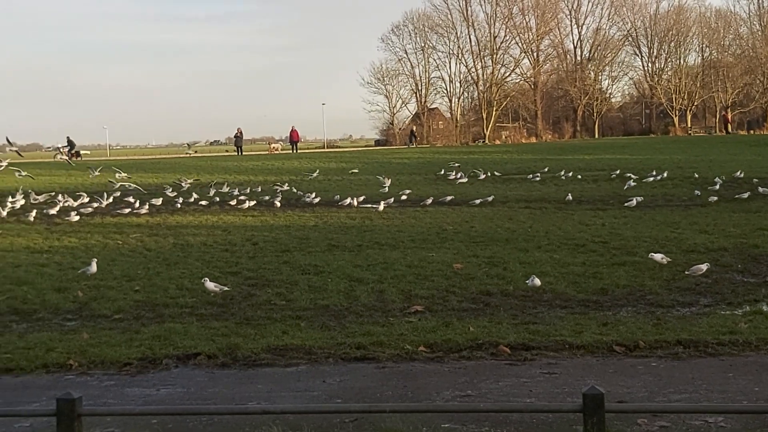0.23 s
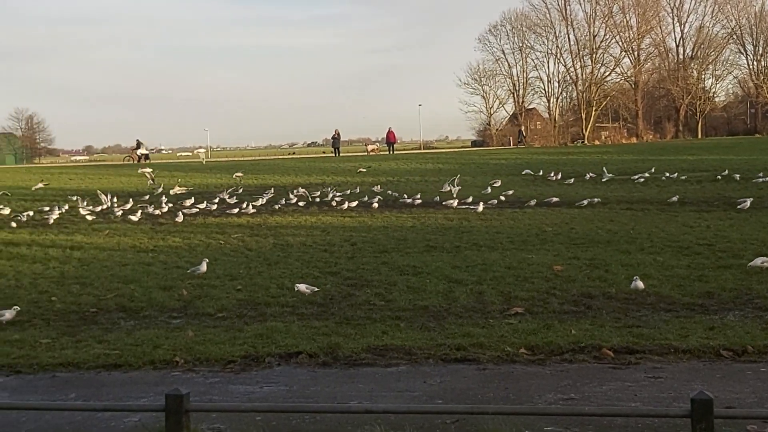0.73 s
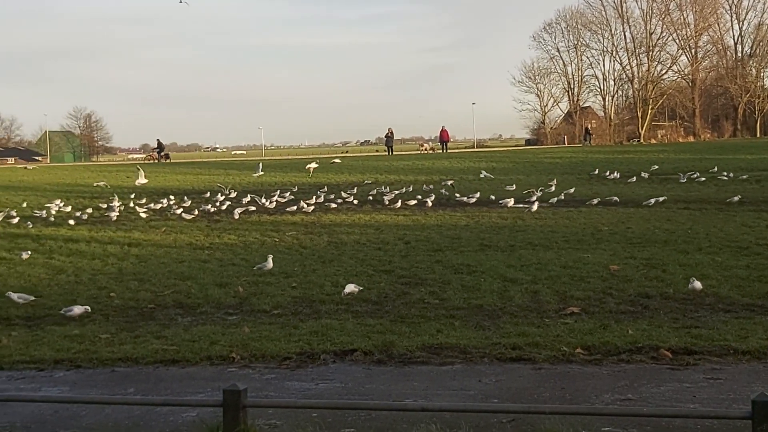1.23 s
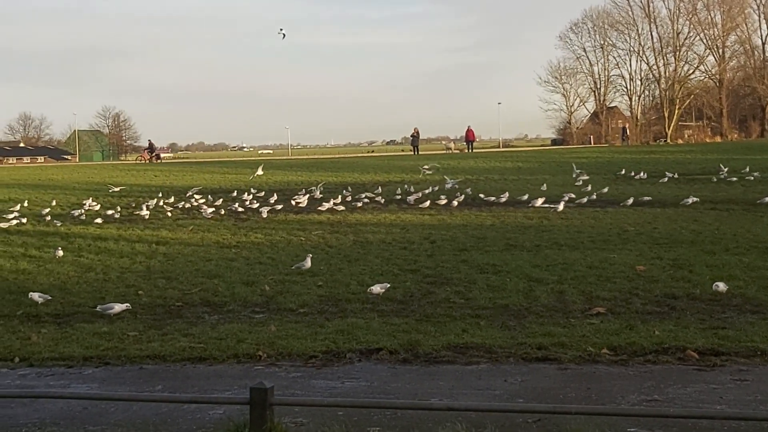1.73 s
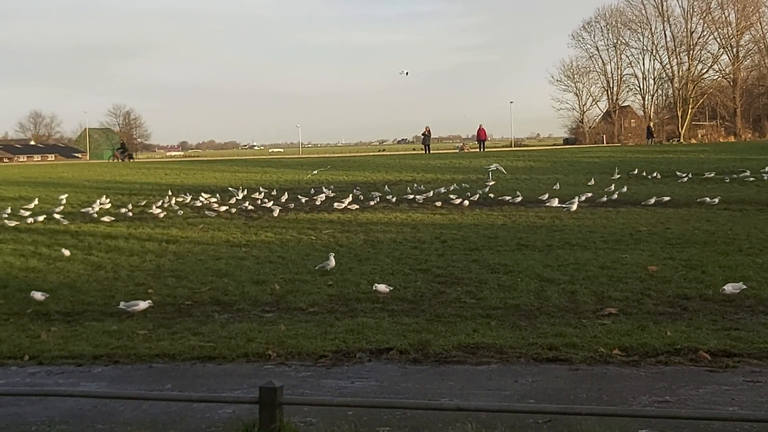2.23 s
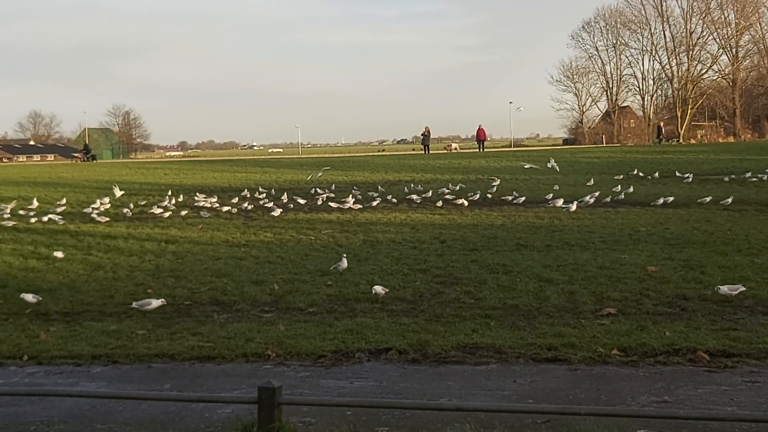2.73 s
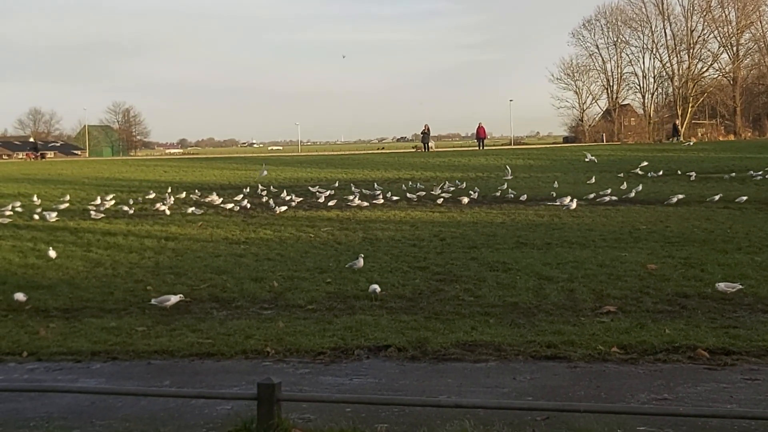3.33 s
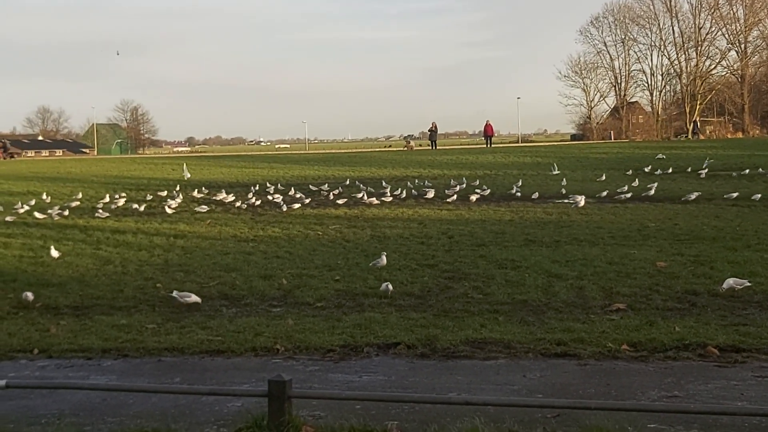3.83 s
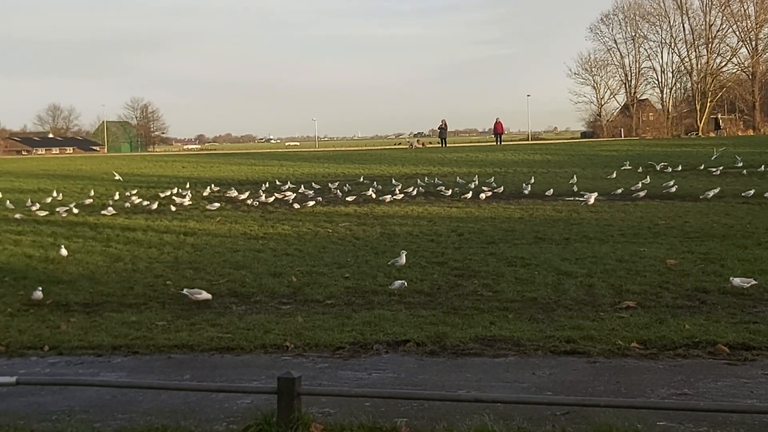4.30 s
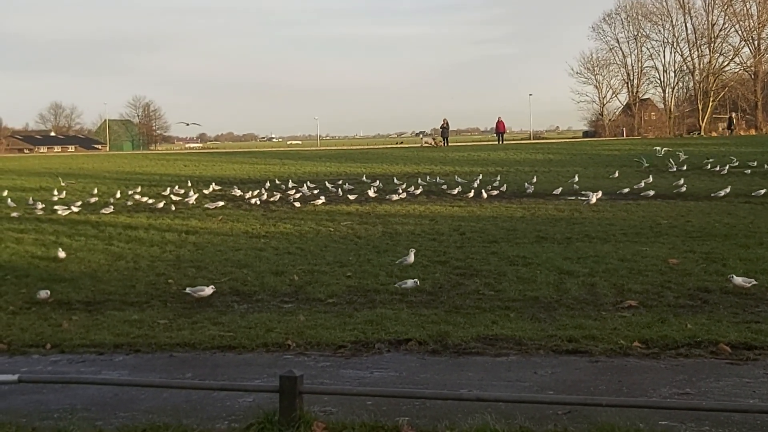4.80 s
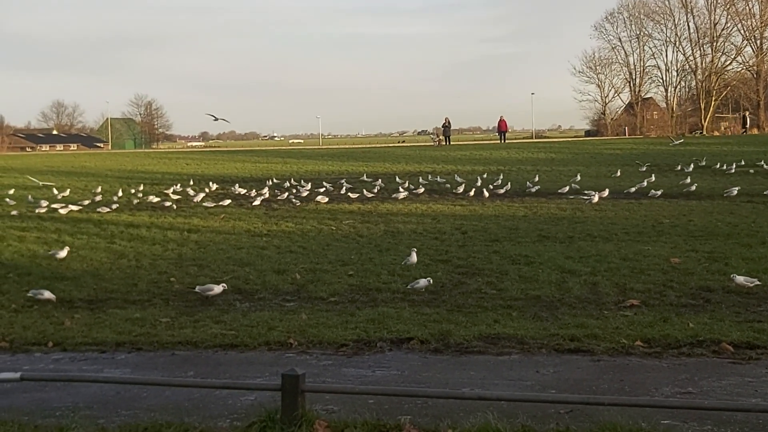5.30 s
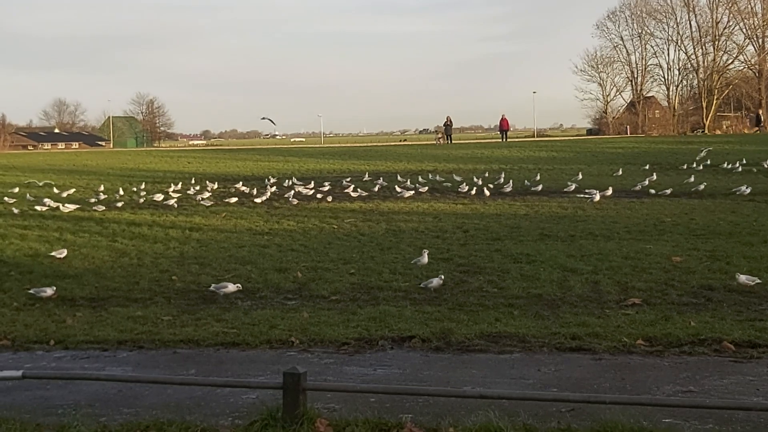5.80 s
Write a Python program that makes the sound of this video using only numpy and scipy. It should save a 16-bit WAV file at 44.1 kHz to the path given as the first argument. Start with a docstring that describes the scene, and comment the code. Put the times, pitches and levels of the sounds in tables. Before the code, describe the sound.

A flock of gulls cries with clear falling calls and raspy screams over an open field, while wind rumbles and finally batters the microphone.

```python
"""Open grass field: a flock of gulls, mostly right of centre, heard by a spaced pair of small microphones.
Near birds: falling clear cries and rattled screams, built from overtones, plus a short tail of echoes.
Behind them: faint overlapping far calls over third-octave hiss bands of changing level.
Wind: rumble, flutter and single buffets of filtered noise on the microphones, hardest near the end."""
import sys
import numpy as np
from scipy import signal
from scipy.fft import rfft, irfft, next_fast_len
from scipy.io import wavfile
from scipy.ndimage import uniform_filter1d

SR = 44100
rng = np.random.default_rng(int(sys.argv[2]) if len(sys.argv) > 2 else 0)


def put_to_file(sound):
    """Save the sound as 16-bit audio at rate SR, in the file named by the first command-line argument."""
    columns = np.atleast_2d(sound).T  # one column per channel
    safe = np.clip(columns, -1, 1)
    whole_steps = np.round(safe * 32767)
    wavfile.write(sys.argv[1], SR, whole_steps.astype(np.int16))


N = 266937

# near-bird voices, by name: start offset below pitch/share (negative: above), start softness/dB,
# start time constant/s, sag curve power, share of sag in one sudden break,
# [warble only: pitch dip at the break/share], overtone levels from the first up/dB
BIRD_VOICES = {"whistle": (0.0046, 7.2, 0.014, 1.2, 0.075, [3, -27, -29, -31, -25.5, -43.5, -49]),
               "pipe": (0.018, 6, 0.008, 2.5, 0.33, [2, -15.5, -44, -50, -56, -60, -62]),
               "shrill": (0.0117, 4.4, 0.023, 1.1, 0.07, [-2, -11, -12, -4.5, -20, -44, -43]),
               "open": (0.029, 3.5, 0.0179, 1.8, 0.079, [-9, -1, -2.5, -7, -22, -13.5, -26]),
               "reedy": (0.052, 4.9, 0.021, 2.8, 0.052, [-6, -8, -6.5, -10, -4, -25, -14, -20, -25, -38, -44]),
               "warble": (0.0427, 2.7, 0.01, 5, 0.2, .06, [-12, -18, -2.5, -8, -4, -9, -19, -16, -21]),
               "squeal": (0.0254, 3.5, 0.017, 1, 0.093, [-32, -1, -11, -17, -44, -38, -33]),
               "chirp": (-0.134, 5.6, 0.0258, 4, 0.045, [-20, 1, -12, -27, -35, -37, -45]),
               "yip": (0.029, 5, .008, 3.5, 0.046, [0, -3, 1, -7, -9, -12, -26, -17, -20, -25]),
               "peep": (0.045, 5, 0.0087, 2.4, 0.05, [-8, -2, -8, -14, 1, -9, -28, -34]),
               "twin": (0.0082, 4, 0.012, 1.35, 0.06, [-28, -1, -26, -1.5, -30, -36, -46]),
               "thin": (0.0416, 5.8, 0.0242, 1.61, 0.029, [-28, -39, -40, -12, 7.5, -1, -7]),
               "scream": (0.14, 7.1, .022, 4.5, 0.076, [-10, 0, -21.5, -25, -25.5, -22.5, -24]),
               "shriek": (0.23, 9, .022, 1.9, 0.098, [-8, -0.5, -14, -33, -18.5, -22.5, -24]),
               "rasp": (0.0538, 13, 0.0139, 0.5, 0.069, [-2, -36, -51, -40, -34, -14, -20])}
# near-bird cries: t/s, length/s, f/Hz, sag by the end/Hz, level/dB, fade by the end/dB,
# brightness/dB per overtone from the strongest, left lag/ms (negative: left leads),
# rattle/Hz (clear cry unless above 30), voice name
GULL_CRIES = [(0.0, 0.33, 1602, 58, -41.5, 6.5, 3.5, 0.32, 6, "whistle"),
              (0.123, 0.13, 4740, 524, -50, -10, -10, .34, 0, "whistle"),
              (0.291, 0.023, 947, 13, -40, 4, 3, 0.48, 0, "squeal"),
              (0.308, 0.02, 1180, 140, -46, -4, -8, .39, 0, "squeal"),
              (0.296, 0.098, 1120, 34, -51, 0, 0.5, .34, 93, "rasp"),
              (0.321, 0.089, 1172, 407, -41, -6, -16, 0.4, 0, "squeal"),
              (0.47, 0.031, 995, 49, -33, -1, -6, 0.46, 183, "squeal"),
              (0.498, 0.029, 925, 31, -33.5, -3, -7, 0.46, 181, "squeal"),
              (0.486, 0.093, 1325, 153, -58.5, 8, 0, .35, -2, "thin"),
              (0.584, 0.068, 1020, 280, -41, -4, -6, 0.44, 3, "chirp"),
              (0.446, 0.13, 1237, 180.5, -41.5, 8.5, 0.5, .41, 91.5, "rasp"),
              (0.6, 0.19, 1044, 68, -52, -2, -1, .34, 86, "rasp"),
              (0.921, 0.041, 1062, -120, -42.5, 12, -14, 0.51, 0, "open"),
              (0.962, 0.285, 1704, 228, -29.5, 12, 2.5, -.17, 0, "pipe"),
              (1.053, 0.14, 865, 28.5, -53, 5, 1.5, -.19, 85.5, "thin"),
              (1.24, 0.046, 1031, 64, -43.5, 5, -1.5, 0.43, 0, "open"),
              (1.449, 0.35, 1012, 73.5, -38, 14, 1.5, 0.31, 77.5, "rasp"),
              (1.74, 0.44, 996, 37.5, -34.5, 8, -1, 0.38, 72, "rasp"),
              (1.796, 0.21, 1737, 188.5, -29, 3.5, 4.5, 0.44, -5, "pipe"),
              (1.859, 0.36, 1087, 41, -42, 14, 1, 0.46, 84, "shriek"),
              (1.822, 0.27, 1633, -40, -42.5, 11, 1, 0.35, 0, "squeal"),
              (2.014, 0.084, 2155, 100, -41.5, 1, -1, 0.46, 0, "whistle"),
              (2.116, 0.18, 1300, 165.5, -37.5, 6, -1, .32, 0, "warble"),
              (2.098, 0.22, 1110, 29.5, -50, -5, -12, 0.43, 88.5, "shriek"),
              (2.364, 0.13, 1598, 120, -51, 8, -11, 0.23, 4, "squeal"),
              (2.349, 0.33, 1049, 32, -84.5, 5, 8.5, .29, 0, "open"),
              (2.637, 0.11, 2034, 264, -41, -7, -1, 0.42, 0, "shrill"),
              (2.663, 0.25, 1390, 251, -37, 8.5, 0, 0.26, 0, "reedy"),
              (2.881, 0.39, 1104, 47, -59, -9, 4, 0.35, 72, "scream"),
              (3.193, 0.39, 1308, 36, -47, 15, 0.5, .33, 68, "squeal"),
              (3.442, 0.46, 1038, 250, -33.5, 10, -0.5, 0.53, 88, "scream"),
              (3.7, 0.6, 959, 73, -52.5, 0, 3.5, .01, 76, "scream"),
              (3.994, 0.26, 1354, 51.5, -52, 3.5, 3, .01, 0, "squeal"),
              (4.364, 0.33, 1069, 191, -36.5, -1, 0.5, .5, 82, "shriek"),
              (4.7, 0.022, 1243, 50, -44, 6, -2, .34, 0, "peep"),
              (4.799, 0.079, 4300, 1250, -56.5, 1, -12, 0.3, -7, "whistle"),
              (4.823, 0.08, 1253, -140, -66.5, -29, -7, 0.25, -34, "squeal"),
              (4.894, 0.14, 1600, 25.5, -48, 4, 1, .35, 0, "twin"),
              (5.036, 0.043, 4820, 899, -57, 6, -12, .23, 0, "whistle"),
              (5.082, 0.19, 1243, 68.5, -47, 5, -3, 0.47, 0, "squeal"),
              (4.87, 0.22, 1087, 22, -59.5, -4, 0.5, 0.35, 96, "rasp"),
              (5.318, 0.23, 1121, 26, -51.5, 27, 2.5, -0.068, 80, "scream"),
              (5.931, 0.17, 1441, 40, -58.5, -1, -1.5, 0.28, 0, "yip")]


def gulls():
    """Near birds: each cry reaches the ears at slightly different times; grass and trees scatter echoes."""
    direct = np.zeros((2, N))
    for start_s, *shape, bright_db, left_lag_ms, rattle_hz, voice in GULL_CRIES:
        *habit, overtones_db = BIRD_VOICES[voice]
        steps = np.arange(len(overtones_db)) - np.argmax(overtones_db)
        track = cry_track(start_s, *shape, *habit)
        place(direct, cry(track, rattle_hz, overtones_db + bright_db * steps), start_s, left_lag_ms)
    t = np.arange(int(.3 * SR)) / SR
    shared = rng.standard_normal(len(t))
    tail = shared + 3.8 * rng.standard_normal((2, len(t)))
    tail = tail * np.exp(-t / 0.16) * (t > .003)
    tail /= np.sqrt(np.sum(tail ** 2, axis=1, keepdims=True))
    echoes = signal.fftconvolve(direct, tail, axes=1)[:, :N]
    return direct + undb(-12) * echoes


RELEASE_DB, RELEASE_POWER = 10.5, 12.4  # extra fade at the very end of a cry
BREAK_AT, BREAK_WIDTH, DIP_WIDTH = .42, 0.052, 0.15  # shares of cry length


def cry_track(start_s, length_s, hz, sag_hz, db, fade_db,
              scoop, soft_db, onset_s, power, sudden, dip=0.):
    """t/s, f/Hz, level/dB: a cry swings to pitch and level, then sags and fades as the breath runs out."""
    u = np.linspace(0, 1, num=32)
    onset = np.exp(-u * length_s / onset_s)
    voice_break = (1 + np.tanh((u - BREAK_AT) / BREAK_WIDTH)) / 2
    spent = (1 - sudden) * u ** power + sudden * voice_break
    pitch_dip = dip * np.exp(-((u - BREAK_AT) / DIP_WIDTH) ** 2)
    track_hz = hz * (1 - scoop * onset - pitch_dip) - sag_hz * spent
    track_db = db - soft_db * onset - fade_db * spent - RELEASE_DB * u ** RELEASE_POWER
    return np.transpose([start_s + u * length_s, track_hz, track_db])


THROAT_HZ, THROAT_RING_DB = 5930, 2.5  # ring level relative to the sixth overtone


def cry(track, rattle_hz, overtones_db):
    """Overtones of the syrinx; a slow second oscillation chops a scream into bursts and sweeps its pitch."""
    s, hz, db = np.transpose(track)
    t = np.arange(s[0], s[-1], 1 / SR)
    n = len(t)
    rough = rattle_hz > 30
    # quick slides turn hoarse
    husk = np.clip(abs(hz[-1] / hz[0] - 1) / (s[-1] - s[0]) / 4, 0, 1)
    jitter = .011 if rough else 0.0058 + 0.015 * husk
    hz = np.interp(t, s, hz) * (1 + jitter * walk(n, 400))
    # rattle slows as the breath runs out
    beat_hz = rattle_hz * np.linspace(1.07, .92, n) * (1 + 0.034 * walk(n, 58.3))
    beat = np.cumsum(beat_hz) / SR + rng.random()  # cycles
    sweep = 2 * np.pi * np.cumsum(hz * rough * 0.052 * np.sin(2 * np.pi * beat)) / SR
    phase = 2 * np.pi * np.cumsum(hz) / SR
    # three more overtones, falling evenly
    db_all = np.append(overtones_db, np.mean(overtones_db[-2:]) - 5.16 * np.arange(1, 4))
    level_db = np.interp(t, s, db)
    effort = undb(0.44 * (level_db - db.max()))  # weaker push dulls a clear cry
    x = np.zeros(n)
    for k, gain in enumerate(undb(db_all), 1):
        gate_beat = beat + 0.024 * k * walk(n, 51.0)
        gate = np.exp((0.75 + 0.06 * k) * rough * np.cos(2 * np.pi * gate_beat))
        angle = k * phase + k ** 0.74 * sweep + 2 * np.pi * rng.random()
        if k == 1 and rough:  # lowest band peaks after each burst, sharp of the series
            gate = np.exp(2.2 * np.cos(2 * np.pi * (beat - .35)))
            angle = 1.1 * angle
        flicker = undb((2.0 + 0.07 * k + 2.5 * husk) * walk(n, 128))
        # throat resonance lifts scream overtones that cross it
        gain = gain * undb(rough * 2.5 * np.exp(-.5 * ((k * hz - THROAT_HZ) / 330) ** 2))
        push = 1 if k == 1 or rough else effort
        audible = k * hz < .45 * SR
        x += gain * push * unit(gate * flicker) * audible * np.sin(angle)
    if rough:  # bursts ring the throat, which moves less than the pitch
        ring_hz = THROAT_HZ * (hz / hz.mean()) ** 0.64 * (1 + 0.032 * walk(n, 300))
        bursts = unit(np.exp(1.3 * np.cos(2 * np.pi * beat)) * undb(1.3 * walk(n, 44.0)))
        ring = np.sin(2 * np.pi * np.cumsum(ring_hz) / SR)
        x += undb(db_all[5] + THROAT_RING_DB) * bursts * ring
    edge = np.clip(np.minimum(t - s[0], s[-1] - t) / 0.003, 0, 1)
    return np.sqrt(2) * x * edge * undb(level_db)


def place(out, x, start_s, left_lag_ms):
    """Path difference to the two microphones: the left hears the bird left_lag_ms after the right."""
    start = int(start_s * SR)
    add(out[1], x, start)
    add(out[0], x, start + int(round(left_lag_ms * SR / 1000)))


# level of the background hiss, uneven over time, used relative to fixed references:
# t/s, hiss level/dB, level of the top hiss bands/dB
HISS_LEVEL = [(0.0, -48.5, -62), (0.24, -61.5, -86), (0.51, -59, -80), (0.89, -60.5, -83), (1.12, -50, -56),
              (1.28, -61, -73), (1.38, -64, -102), (1.47, -51.5, -64), (1.52, -62, -78), (2.05, -46, -66),
              (2.2, -43.5, -66), (2.55, -67.5, -87), (2.75, -46, -59), (3.36, -57.5, -63.5),
              (3.42, -66, -78.5), (3.47, -46, -85), (3.7, -43.5, -60.5), (4.28, -62.5, -79),
              (4.6, -51, -67), (4.97, -49.5, -85), (5.26, -60, -95.5), (5.36, -63, -68), (5.55, -66, -65),
              (5.61, -78, -95), (5.88, -72.5, -102), (6.05, -65, -75)]
# extra slow change of the low hiss bands, full below 800 Hz, none above 1100 Hz: t/s, level/dB
LOW_HISS_LEVEL = [(0, 0), (2.25, 0), (2.55, -4.5), (4.4, -3), (5.2, 0), (5.7, -13)]
# background hiss spectrum: f/Hz, relative density/dB per Hz
HISS_SPECTRUM = [(290, -33), (500, 1), (660, 6), (850, 2), (1220, 2), (1430, 3), (2070, -1), (2460, -7),
                 (2970, -12.5), (4190, -7.5), (4910, -15), (6180, -10.5), (8000, -23.5), (15500, -32)]


def far_calls_and_hiss(count=70):
    """Faint overlapping calls of distant birds, plus third-octave hiss bands of changing level."""
    hiss_db, top_hiss_db = curve(HISS_LEVEL)
    low_db, = curve(LOW_HISS_LEVEL)
    voices = np.zeros((2, N))
    for u in rng.random((count, 6)):
        s, hz, length_s = 6.3 * u[0] - .3, 900 + 300 * u[1], .08 + .3 * u[2]
        scream = u[3] <= .7
        if scream:
            track = [(s, .95 * hz, -8), (s + 0.264 * length_s, hz, 0), (s + length_s, .93 * hz, -6)]
        else:  # fainter clear yelp, falling in pitch after its peak
            track = [(s, 1.1 * hz, -9), (s + .15 * length_s, 1.12 * hz, -3),
                     (s + .6 * length_s, 1.04 * hz, -9)]
        x = cry(track, (70 + 70 * u[3]) * scream, [4.0, 2.0, -8.5, -8.5, -10.5, -13.5, -11.0])
        place(voices, x * undb(-8 * u[4] ** 2), s, 0.33 + 0.22 * u[5])
    hiss, drift = np.zeros((2, N)), walk(N, 4.1)
    spectrum_hz, spectrum_db = np.transpose(HISS_SPECTRUM)
    for hz in 500 * 2 ** np.arange(0, 5.1, 1 / 3):
        mid, left, right = (band(N, hz, 0.16) for _ in range(3))
        band_db = np.interp(np.log(hz), np.log(spectrum_hz), spectrum_db) + 10 * np.log10(hz / 1000)
        # lowest bands follow the hiss level least, highest follow the top-hiss level
        up = np.clip(np.log2(hz / 6500), 0, 1)
        depth = np.clip(hz / 9000, .35, .7) * np.clip((hz - 450) / 700, .15, 1)
        follow_db = depth * ((1 - up) * (hiss_db + 57.0) + up * (top_hiss_db + 82.5))
        follow_db += np.clip((1100 - hz) / 300, 0, 1) * low_db
        gain = undb(band_db + follow_db + 0.4 * drift + (2.8 - up) * walk(N, 10))
        common = np.array([np.roll(mid, 16), mid])  # left lags 16 samples
        hiss += gain * (0.24 * common + 0.42 * np.array([left, right]))
    return undb(-53.0) * hiss + undb(-48 + .5 * (hiss_db + 60.0)) * unit(voices)


# steady wind, before crossfeed, port colour and soft clip: t/s, rumble level/dB, flutter level/dB
STEADY_WIND = [(0.0, -44.5, -46), (0.2, -61, -42), (0.29, -49, -55.5), (0.6, -41, -54.5),
               (0.8, -49.5, -47.5), (1.15, -44.5, -59), (1.39, -61, -61.5), (1.58, -58.5, -47.5),
               (1.7, -45, -57), (1.86, -41, -50), (2.2, -46.5, -55.5), (2.43, -54.5, -59),
               (2.61, -77, -60.5), (2.78, -41, -55), (3.04, -71, -62), (3.14, -40.5, -42.5),
               (3.42, -51, -56), (3.6, -47, -58.5), (3.78, -65, -61), (4.08, -70, -61), (4.21, -41, -45),
               (4.42, -68.5, -58.5), (4.73, -39.5, -44), (4.91, -78, -69), (5.02, -41, -33.5),
               (5.08, -33.5, -27.5), (5.22, -37, -43), (5.31, -34.5, -29), (5.66, -44.5, -46.5),
               (6.0, -34, -29.5)]
# wind buffets, before port colour and soft clip: t/s, left level/dB, right level/dB, centre f/Hz
WIND_BUFFETS = [(0.172, -34.5, -59, 100), (0.621, -34, -36, 112), (0.66, -36.5, -38, 340),
                (0.869, -33, -34, 125), (0.989, -62, -40, 306), (1.156, -31.5, -33.5, 142),
                (1.509, -48, -33.5, 157), (1.664, -34, -41, 150), (1.715, -27.5, -30.5, 247),
                (1.828, -26, -37, 95), (1.976, -41, -36, 81.5), (2.101, -34, -36, 97),
                (2.409, -34.5, -44, 107), (2.792, -30.5, -35.5, 95), (3.1, -38.5, -46, 242),
                (3.193, -49, -31, 79.5), (3.545, -36, -34, 95), (3.681, -32.5, -38, 213),
                (4.169, -38, -32, 151), (4.225, -30, -27.5, 186), (4.372, -35.5, -33.5, 215),
                (4.43, -44, -34.5, 332), (4.58, -40.5, -36.5, 300), (4.63, -34.5, -35, 145),
                (4.703, -28.5, -26, 181), (5.058, -23, -23, 245), (5.105, -17, -51, 263),
                (5.116, -24, -15.5, 296), (5.176, -17, -14, 332), (5.191, -12.5, -11.5, 313),
                (5.218, -11.5, -11, 334), (5.232, -15.5, -26, 384), (5.252, -20.5, -17.5, 320),
                (5.28, -21, -47, 373), (5.293, -47, -19, 219), (5.363, -21.5, -27, 260),
                (5.395, -24, -24, 326), (5.419, -27, -30, 302), (5.467, -26, -21.5, 274),
                (5.5, -30.5, -32, 312), (5.55, -33, -41, 151), (5.585, -35.5, -38, 378),
                (5.61, -58, -30.5, 300), (5.7, -32.5, -39, 279), (5.785, -56, -34, 315),
                (5.834, -20.5, -28, 292), (5.878, -39, -26.5, 305), (5.913, -39, -30, 350),
                (5.947, -22.5, -24, 179), (5.991, -21, -15.5, 240), (6.03, -42, -54, 320)]
# microphone ports ringing in the wind: f/Hz, level/dB
PORT_COLOUR = [(100, 4), (190, -5), (340, 3), (490, -2.5), (800, -1.5), (2000, -12.5)]


def wind():
    """Turbulence at each microphone, partly in step: lumpy rumble, flutter and separate buffets."""
    rumble_db, flutter_db = curve(STEADY_WIND)
    out, lumps = np.zeros((2, N)), walk(N, 22.02)
    for side in out:
        lump_db = 3 * lumps + 4 * walk(N, 35)
        rumble = band(N, 88.4, 0.96) * undb(lump_db)
        side += unit(rumble) * undb(rumble_db)
        flutter = band(N, 378, 0.5) * undb(1.09 * lump_db + 3.8 * walk(N, 90))
        side += unit(flutter) * undb(flutter_db)
    out = out - .15 * out[::-1]  # eddies press one port while they pull the other
    t = np.arange(-2048, 2048) / SR
    for s, *ears_db, hz in WIND_BUFFETS:
        for side, db in zip(out, ears_db):
            width_s = 0.0052 + 0.00031 * max(db + 24.5, 0)
            shape = np.exp(-.5 * (t / width_s * np.where(t < 0, 1.5, .8)) ** 2)
            body = band(len(t), hz, 0.7)
            # harder buffets spray further up
            spray = band(len(t), 1.8 * hz, 0.98) * np.exp(-(t / 0.021) ** 2)
            x = (body + undb(-10.5 + 0.99 * (db + 16.5)) * spray) * shape
            level = undb(db) * np.sqrt(np.sum(shape ** 2) / np.sum(x ** 2))
            add(side, x * level, int((s + t[0]) * SR))
    return 1.016 * np.tanh(colour(out, PORT_COLOUR) / 1.152)  # capsules round off the hardest blows


def undb(db):
    """Amplitude ratio of a level in dB."""
    return 10 ** (np.asarray(db, float) / 20)


def unit(x):
    """Scale to rms 1."""
    return x / np.sqrt(np.mean(x ** 2))


def curve(table):
    """Value columns of a (t/s, value, ..) table, interpolated to each sample."""
    s, *columns = np.transpose(table)
    return [np.interp(np.arange(N) / SR, s, c) for c in columns]


def walk(n, rate_hz):
    """Random levels held 1 / rate_hz and slewed twice; spread near 1."""
    hold = max(int(SR / rate_hz), 1)
    steps = np.repeat(rng.standard_normal(n // hold + 1), hold)
    return 1.406 * uniform_filter1d(uniform_filter1d(steps, hold), hold)[:n]


def colour(x, points):
    """Filter by (f/Hz, level/dB) points, joined straight on a log frequency axis."""
    hz, db = np.transpose(points)
    size = next_fast_len(x.shape[-1])
    f = np.arange(size // 2 + 1) * SR / size + 1
    gain = undb(np.interp(np.log(f), np.log(hz), db))
    return irfft(rfft(x, size) * gain, size)[..., :x.shape[-1]]


def band(n, hz, octaves):
    """Noise with a bell-shaped spectrum on a log axis, rms 1."""
    f = np.arange(n // 2 + 1) * SR / n + 1
    bell = np.exp(-.5 * (np.log2(f / hz) / octaves) ** 2)
    return unit(irfft(rfft(rng.standard_normal(n)) * bell, n))


def add(out, x, start):
    """Mix x into out from sample start, clipped to the ends."""
    a = min(max(start, 0), N)
    b = max(min(start + len(x), N), a)
    out[a:b] += x[a - start:][:b - a]


# bird and hiss sound, right relative to left: f/Hz, level/dB
RIGHT_OVER_LEFT = [(300, 2), (1200, 0.5), (1800, -1.5), (2600, 2), (4000, 1.5), (7000, 3), (14000, 8.5)]


def scene():
    """Birds and hiss, coloured differently left and right, plus wind."""
    birds = gulls() + far_calls_and_hiss()
    # half the difference on each side
    right = [(hz, db / 2) for hz, db in RIGHT_OVER_LEFT]
    left = [(hz, -db) for hz, db in right]
    birds = np.array([colour(birds[0], left), colour(birds[1], right)])
    return birds + wind()


TOP_HZ = 15730


def record(dry):
    """A bass cut at 30 Hz and a steep top cut at TOP_HZ."""
    bass_cut = signal.butter(2, 30, "high", fs=SR, output="sos")
    top_cut = signal.ellip(14, .3, 80, TOP_HZ, fs=SR, output="sos")
    return signal.sosfilt(top_cut, signal.sosfilt(bass_cut, dry))


dry = scene()
out = record(dry)
put_to_file(out)
```